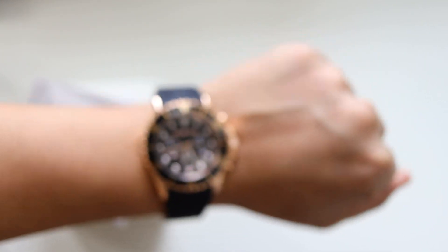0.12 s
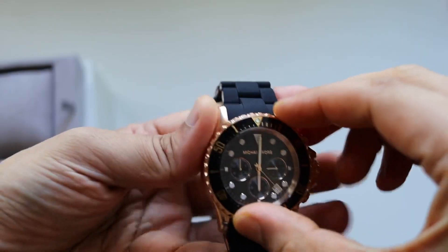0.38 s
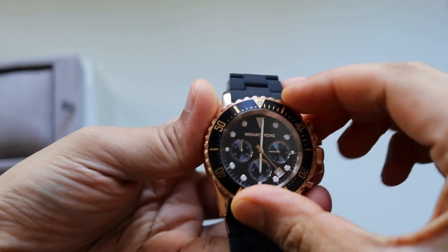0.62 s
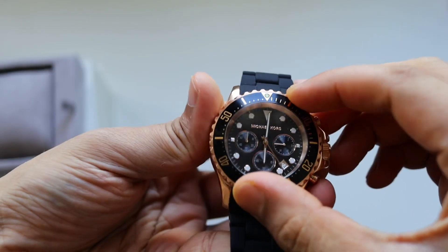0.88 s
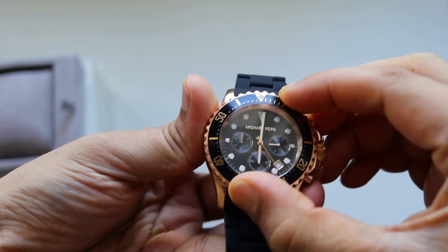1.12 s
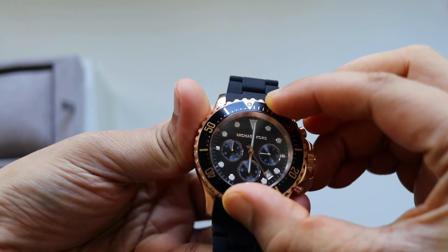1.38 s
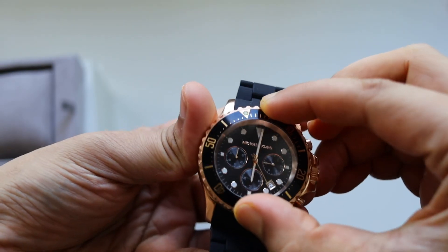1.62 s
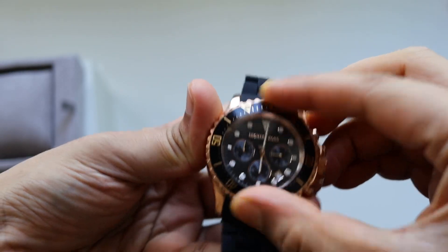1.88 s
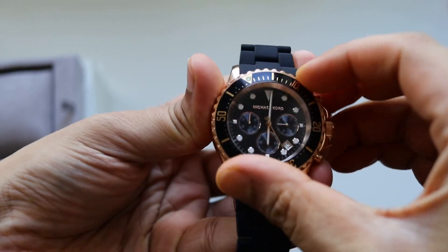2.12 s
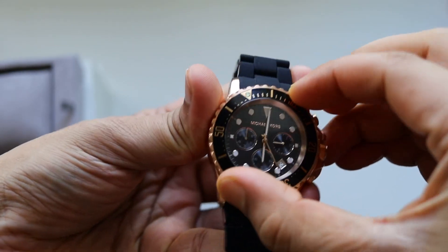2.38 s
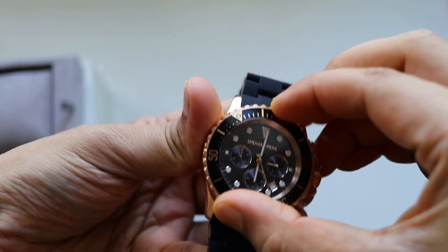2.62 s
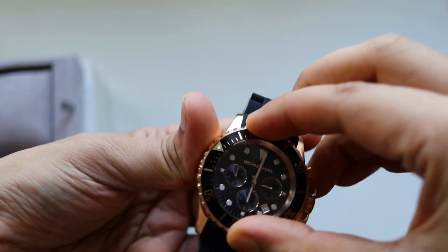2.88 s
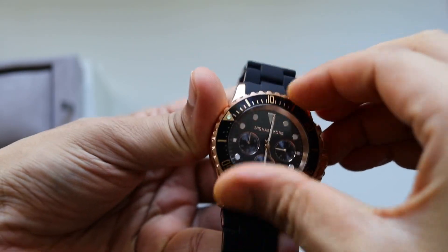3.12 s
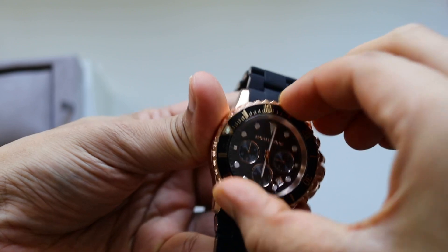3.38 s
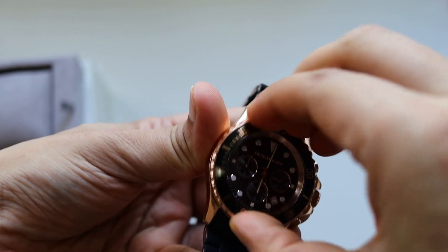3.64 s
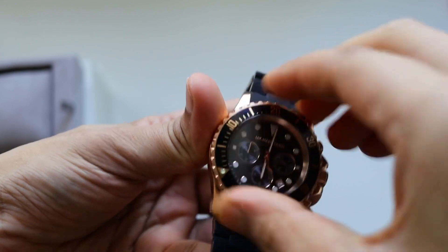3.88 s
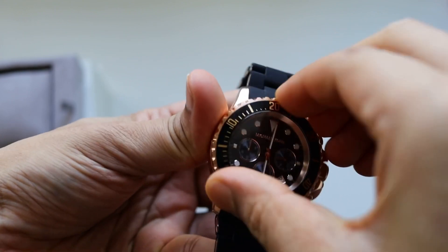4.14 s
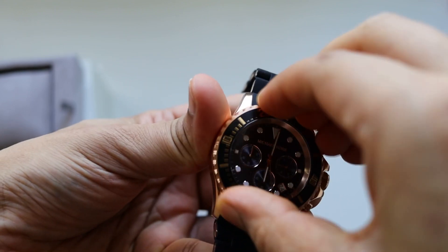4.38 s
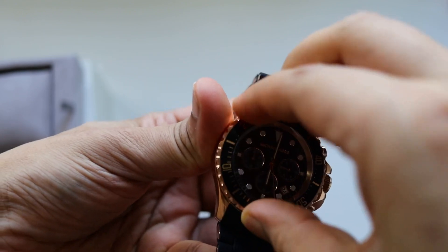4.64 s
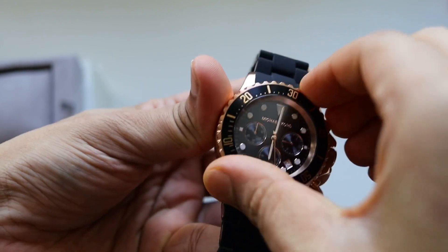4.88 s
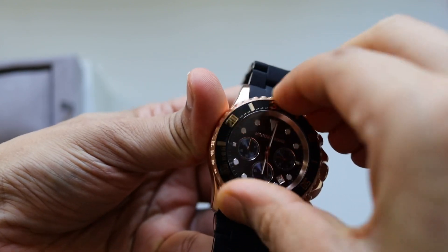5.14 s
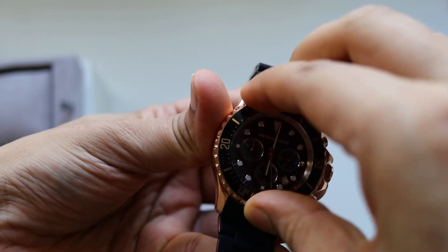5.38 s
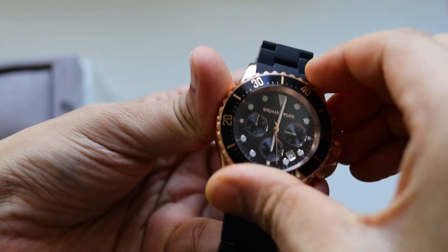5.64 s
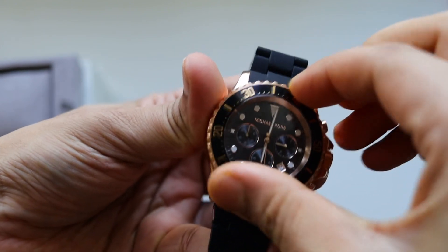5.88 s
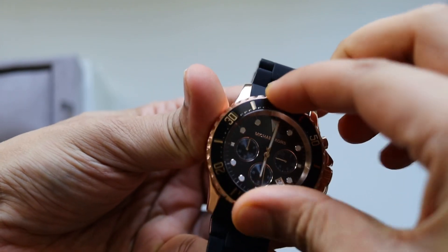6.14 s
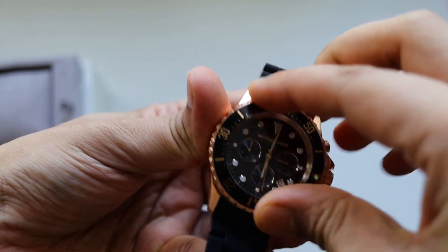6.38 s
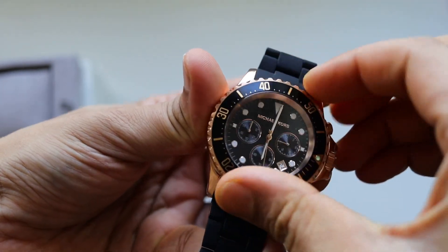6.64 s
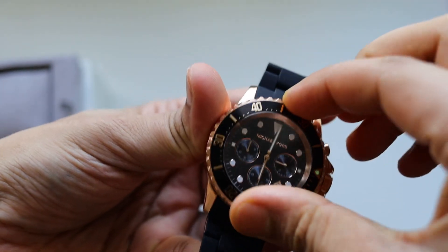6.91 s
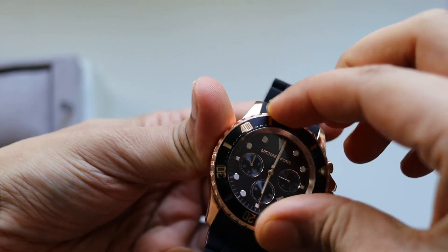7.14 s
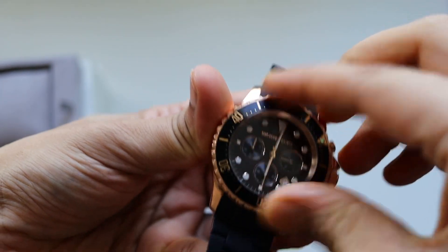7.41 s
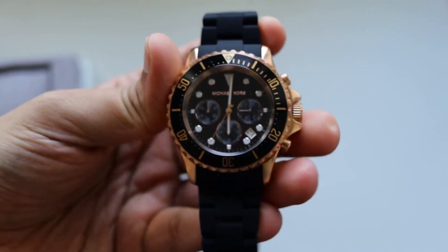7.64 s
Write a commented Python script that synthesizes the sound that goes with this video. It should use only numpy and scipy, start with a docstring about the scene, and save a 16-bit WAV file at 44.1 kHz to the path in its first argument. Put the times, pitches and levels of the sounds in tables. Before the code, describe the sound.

A watch bezel is turned by hand in seven short pushes, each a quick run of bright, crisp metallic ratchet clicks, close up in a quiet room.

```python
"""A quiet room comes on after a quarter second: filtered noise makes its rumble, microphone hiss and faint drone.
A bright rustle of skin follows, and a faint ticking, like a small focus motor, starts and stops throughout.
From 1.4 s a watch bezel is turned by hand in seven short pushes, close to a stereo microphone.
A spring pawl snaps over each tooth: noise bursts crack and set modes of the steel ring and case ringing.
Between pushes, and after the last, hands knock softly and rub as they shift their grip."""
import sys
import numpy as np
from scipy import signal
from scipy.fft import rfft, irfft, next_fast_len
from scipy.io import wavfile

SR = 44100
rng = np.random.default_rng(int(sys.argv[2]) if len(sys.argv) > 2 else 0)


def unload_audio(sound):
    """Save the sound as a 16-bit wav file, at the path given as the first command line argument."""
    columns = np.transpose(np.atleast_2d(sound))
    # keep every value between -1 and 1, then stretch to whole-number steps
    steps = np.round(np.clip(columns, -1, 1) * 32767)
    wavfile.write(sys.argv[1], SR, steps.astype(np.int16))


def boost(x):
    """Linear amplitude factor 10**(x/20) for a level x in decibels (scalar or array-like)."""
    u = np.asarray(x, float) / 20
    return 10 ** u


N = 342812   # length in samples


def rms_one(x):
    """Scales a sound to an rms of 1."""
    return x / np.sqrt(np.mean(x ** 2) + 1e-20)


def early_rms(x):
    """Rms of each sound over its first 10 ms."""
    return np.sqrt(np.mean(x[:, :, :SR // 100] ** 2, axis=2, keepdims=True))


def at_hz(points, hz):
    """Reads a table of (Hz, value) at any pitch, on a logarithmic pitch scale."""
    table_hz, values = np.transpose(points)
    return np.interp(np.log(hz), np.log(table_hz), values)


def band(x, low_hz, high_hz):
    """Keeps the part of a sound between two pitches."""
    return signal.sosfilt(signal.butter(2, [low_hz, high_hz], "band", fs=SR, output="sos"), x)


def drift(corner_hz):
    """Slow chance with spread 1: noise smoothed at one fortieth of the sample rate."""
    r = np.exp(-80 * np.pi * corner_hz / SR)
    slow = signal.lfilter([1], [1, -2 * r, r * r], rng.standard_normal(N // 40 + 2002))[2000:]
    return np.interp(np.arange(N) / 40, np.arange(len(slow)), rms_one(slow))


def ring(force, hz, t60):
    """A mode: a unit click sets a sine of height 1 ringing, which falls 60 dB in t60 seconds."""
    r, w = boost(-60 / (t60 * SR)), 2 * np.pi * hz / SR
    return signal.lfilter([0, np.sin(w)], [1, -2 * r * np.cos(w), r * r], force + 1e-18)


def pair(mid, side, alike):
    """Left and right from a shared and an opposed part."""
    alike = np.clip(alike, -1, 1)
    return np.sqrt(1 + alike) * mid + np.sqrt(1 - alike) * side * np.array([[1], [-1]])


def sides(pan_db):
    """Left and right gains; pan_db is how much louder the left is."""
    return boost(np.stack([pan_db, -pan_db], axis=-1)[..., None] / 2)


def place(times, sounds):
    """Lays short stereo sounds at their moments."""
    out = np.zeros((2, N + sounds.shape[-1]))
    for s, sound in zip(times, sounds):
        first = round(s * SR)
        out[:, first:first + sound.shape[-1]] += sound
    return out[:, :N]


# Faint appliance drone. Each row: middle pitch in Hz, width in Hz, rms level in dB.
DRONE_BANDS = [(101.4, 4, -88), (803, 65, -81), (1588, 56, -94)]


def hum():
    """Narrow bands of noise, the same on both sides, are heard as a wavering drone."""
    return sum(boost(db) * rms_one(band(rng.standard_normal(N), hz - width / 2, hz + width / 2))
               for hz, width, db in DRONE_BANDS)


# Colour of the room's rumble and hiss. Each row: pitch in Hz, relative level per Hz in dB.
ROOM_COLOUR = [(15, -51), (25, -24.5), (103, -0.5), (193, -9.5), (282, -5.5), (403, -15), (817, -17.5),
               (937, -16.5), (2180, -23.5), (4080, -24.5), (6660, -31), (14300, -35.5), (16800, -41.5)]
# How alike left and right are in the room tone. Each row: pitch in Hz, likeness (1 same, -1 opposed).
ROOM_LEFT_RIGHT = [(60, 0.98), (240, 0.92), (950, 0.39), (3770, -0.28), (15000, 0.078)]


def room_tone(room_db=-64.5, flicker_db=1.16):
    """Third-octave bands of rumble and hiss, each with its own level, slight flicker and likeness."""
    out = 0
    edges_hz = 22 * 2 ** np.arange(0, 9.8, 1 / 3)
    white = rng.standard_normal((2, 2, N))
    for k, (low_hz, high_hz) in enumerate(zip(edges_hz, edges_hz[1:])):
        mid, side = band(white[k % 2], low_hz, high_hz)   # neighbouring bands use different noise
        hz = np.sqrt(low_hz * high_hz)
        level = boost(at_hz(ROOM_COLOUR, hz) + flicker_db * drift(2.6))
        out = out + level * pair(mid, side, at_hz(ROOM_LEFT_RIGHT, hz))
    return boost(room_db) * rms_one(out)


def rustle(middle_s=0.298, spread_s=0.017, level_db=-65):
    """Skin rubs briefly: one bright hiss swells and fades, different on each side."""
    swell = np.exp(-0.5 * ((np.arange(N) / SR - middle_s) / spread_s) ** 2)
    return boost(level_db) * swell * rms_one(band(rng.standard_normal((2, N)), 2900, 17000))


# Faint motor steps in even runs. Each row: first step in seconds, last step in seconds, number of steps.
STEP_RUNS = [(.313, .952, 12), (1.062, 1.311, 6), (1.835, 1.892, 2), (2.060, 2.109, 2), (2.172, 2.413, 5),
             (3.048, 3.338, 6), (3.901, 4.049, 4), (4.108, 4.168, 2), (4.786, 4.891, 3), (4.950, 5.011, 2),
             (5.531, 5.890, 7), (6.554, 6.845, 6), (7.444, 7.621, 4), (7.671, 7.719, 2)]
# What a step rings. Each row: pitch in Hz, strength in dB, time to fall 60 dB in seconds.
HOUSING_MODES = [(3570, -27, 0.0013), (4010, 7, 0.0022), (4860, -6, 0.0072), (5460, -8, 0.0046)]


def motor_steps(peak_db=-63, uneven_db=3.5, mode_uneven_db=2.6, burst_s=0.0024):
    """Each step is a tiny burst of force that rings a small plastic housing."""
    s = np.concatenate([np.linspace(*run) for run in STEP_RUNS])
    t = np.arange(SR // 30) / SR
    force = rng.standard_normal((len(s), len(t))) * t * np.exp(-t / burst_s)
    rung = 0
    for hz, db, t60 in HOUSING_MODES:
        strength = boost(db + mode_uneven_db * rng.standard_normal((len(s), 1)))
        rung = rung + strength * ring(force, hz, t60)
    peak = boost(peak_db + uneven_db * rng.standard_normal((len(s), 1)))   # before panning
    rung = rung * peak / np.abs(rung).max(axis=1, keepdims=True)
    return place(s, rung[:, None] * sides(-3.0))


# Hands shifting their grip, a dull rubbing.
# Each row: start in seconds, hold in seconds, level in dB before panning.
GRIP_SHIFTS = [(2.33, 0.02, -69), (4.695, 0.065, -62), (4.83, 0.029, -62), (6.494, 0.11, -65.5),
               (7.619, 0.032, -64)]


def grip(slips_per_s=160, skin_hz=340, rise_db_per_s=307, fall_db_per_s=215, pan_db=-8.5):
    """Skin sticks and slips on case and strap: uneven soft pulses into a dull resonance."""
    t = np.arange(N) / SR
    effort = 0
    for s, hold, db in GRIP_SHIFTS:
        rise = rise_db_per_s * np.maximum(s - t, 0)
        fall = fall_db_per_s * np.maximum(t - s - hold, 0)
        effort = effort + boost(db - rise - fall)
    slips = (rng.random(N) < slips_per_s / SR) * boost(1.26 * rng.standard_normal(N))
    rub = rms_one(band(ring(slips, skin_hz, 0.0072), 114, 1350))
    return effort * rub * sides(pan_db)


# Soft knocks of fingers and strap. Each row: start in seconds, peak in dB before panning, pitch in Hz,
# contact time in seconds, how much louder the left is in dB.
SOFT_KNOCKS = [(2.138, -50.5, 2300, 0.0028, -9), (2.149, -59, 2400, 0.0037, -8),
               (2.262, -38, 280, 0.0045, -8), (2.329, -53, 400, 0.0033, -2), (3.09, -62, 690, 0.0028, -12),
               (5.566, -54, 700, .003, -19), (7.511, -53, 675, 0.0035, -18)]


def knocks(scuff_db=-8, ring_cycles=12.7):
    """Each soft contact is a short burst of force: a broad scuff and one dull resonance."""
    t, sounds = np.arange(SR // 8) / SR, []
    for s, peak_db, hz, contact_s, pan_db in SOFT_KNOCKS:
        force, scuff = rng.standard_normal((2, len(t))) * t * np.exp(-t / contact_s)
        # the resonance falls 60 dB in ring_cycles of its own pitch
        dull = rms_one(band(ring(force, hz, ring_cycles / hz), hz / 2, hz * 2))
        knock = dull + boost(scuff_db) * rms_one(band(scuff, hz * 0.51, hz * 1.9))
        sounds.append(boost(peak_db) * knock / np.abs(knock).max() * sides(pan_db))
    return place(np.array(SOFT_KNOCKS)[:, 0], np.array(sounds))


# How alike left and right are in a snap. Each row: pitch in Hz, likeness (1 same, -1 opposed).
SNAP_LEFT_RIGHT = [(1300, 0.73), (3000, 0.8), (6000, 0.95), (9000, 0.9), (14000, 0.98)]
# Each row: pitch in Hz, how much louder the left is in dB.
SNAP_LEFT_LOUDER = [(1300, -2), (2500, -3), (5000, -0.5), (9000, 1), (14000, -4.5)]
# Each row: pitch in Hz, phase in radians by which the left leads.
SNAP_LEFT_LEAD = [(1300, 0.45), (3000, 0.16), (6000, 1.07), (9000, 1.88), (14000, 0.82)]


def two_ports(x):
    """A close, directional source reaches the two ports with its own level, phase and likeness at each pitch."""
    size = next_fast_len(N)
    hz = np.maximum(np.arange(size // 2 + 1) * SR / size, 20)
    mid, side = rfft(x, size)
    # half the difference goes to each port, in opposite directions
    louder = at_hz(SNAP_LEFT_LOUDER, hz) * np.log(10) / 40
    lead = 0.5j * at_hz(SNAP_LEFT_LEAD, hz)
    turn = np.exp((louder + lead) * np.array([[1], [-1]]))
    return irfft(pair(mid, side, at_hz(SNAP_LEFT_RIGHT, hz)) * turn, size)[:, :N]


def pawl_force(t, harder_db, peak_db):
    """Strength of the force: the pawl scrapes up to the tip, drops, rebounds once and chatters to rest."""
    slip_db, slip_s, chatter_db, chatter_s = -22, 0.0018, -16, 0.006
    rebound_db, rebound_s, crack_s, softer_db = -14, 0.0029, 0.00044, 11.0
    # weaker snaps land more softly; crack_s is the landing at -17.5 dB
    land_s = crack_s * np.exp(-(peak_db[:, None] + 17.5) / softer_db)
    late, strength = rng.standard_normal((2, len(harder_db), 1))
    back = t - rebound_s * np.exp(0.2 * late)   # time since the rebound
    slip = boost(slip_db) * (t < 0) * np.exp(-np.abs(t) / slip_s)
    chatter = boost(chatter_db) * np.exp(-np.abs(t) / chatter_s)
    drop = (t >= 0) * (np.exp(-np.abs(t) / land_s) + chatter)
    rebound = boost(rebound_db + 3.7 * strength) * (back >= 0) * np.exp(-np.abs(back) / land_s)
    return slip + drop + rebound


def add_modes(register, force, modes, tune, detune, spread_db=1.5):
    """Adds to a crack the modes that ring on; the fingers load the watch differently at every tooth."""
    count = len(force)
    for hz, mode_db, t60 in modes:
        shifted_hz = hz * tune * np.exp(detune * rng.standard_normal(count))
        rung = np.array([ring(f, f_hz, t60) for f, f_hz in zip(force, shifted_hz)])
        energy = np.sqrt(np.mean(rung ** 2, axis=2, keepdims=True))
        rung = rung * energy.mean() / energy   # every tooth feeds each mode about alike
        register = register + rung * boost(mode_db + spread_db * rng.standard_normal((count, 1, 1)))
    return register


# Pawl snaps, one per tooth. Each row: time in seconds, snap level in dB that the part levels build on.
TOOTH_SNAPS = [(1.392, -23), (1.4481, -23), (1.502, -22), (1.558, -23), (1.619, -20), (1.6612, -19.5),
               (1.7, -17.5), (1.729, -18.5), (2.4448, -38), (2.482, -32), (2.5331, -24), (2.6465, -25),
               (2.699, -22.5), (2.7386, -20.5), (2.7659, -20), (2.794, -16.5), (2.8188, -18.5),
               (2.8362, -20.5), (2.8542, -17.5), (2.8736, -21.5), (2.897, -16), (3.4004, -11),
               (3.4201, -14.5), (3.4398, -14.5), (3.457, -19.5), (3.475, -19), (3.496, -21), (3.52, -22.5),
               (3.544, -26.5), (3.574, -24.5), (3.5943, -21), (3.6127, -26), (3.6324, -27), (3.6525, -21),
               (3.67, -24.5), (3.69, -23.5), (3.706, -20), (3.718, -32.5), (3.729, -24), (3.7479, -21.5),
               (3.781, -21.5), (4.219, -37.5), (4.2421, -22.5), (4.3161, -24.5), (4.3443, -23.5),
               (4.3623, -26), (4.3995, -23.5), (4.4389, -24), (4.4644, -26), (4.4955, -25), (4.5253, -25),
               (4.545, -28.5), (4.569, -23.5), (4.587, -23.5), (4.6062, -22), (4.6257, -21.5),
               (4.6523, -27), (5.063, -25), (5.0919, -17.5), (5.1542, -21), (5.1828, -24), (5.1986, -23.5),
               (5.2264, -17.5), (5.246, -18), (5.2736, -18), (5.3048, -20), (5.3158, -19), (5.3458, -18),
               (5.3591, -19), (5.3766, -21.5), (5.3937, -19), (5.4663, -29), (5.9431, -20), (5.9664, -16.5),
               (5.991, -18), (6.0422, -15.5), (6.0736, -18), (6.105, -15), (6.143, -13), (6.1671, -16.5),
               (6.1911, -16.5), (6.218, -17), (6.2521, -19), (6.278, -24), (6.2953, -22), (6.3065, -28),
               (6.328, -20.5), (6.3411, -22), (6.8822, -17), (6.9, -15), (6.929, -17), (6.9762, -16.5),
               (7.004, -20.5), (7.046, -17.5), (7.0808, -21), (7.1142, -24), (7.1408, -22.5),
               (7.197, -19.5), (7.225, -18), (7.2511, -17.5), (7.305, -17), (7.3254, -19.5)]
# Each push holds the watch in its own way. Each row: start in seconds, case level in dB, edge level in dB,
# edge drift in dB per second, case pitch factor. The levels add to those of the snap and the part.
HAND_PUSHES = [(1.39, -15, -22, 34, 1.2), (2.44, -16, -15.5, 19, 1.056), (3.4, -16, -17, -8, 1.026),
               (4.22, -18.5, -20, 0, 0.92), (5.06, -20.5, -14.5, 4.5, 0.97), (5.94, -14, -14, 2.5, 0.976),
               (6.88, -16.5, -9, -8, 0.94)]
# Ring balance for each push: gain in dB of the treble around 10 kHz.
PUSH_TREBLE_DB = [3.5, 1.5, -0.5, 1, -0.3, 1.7, 0.5]
# Three parts of a snap: case, ring and edge. Each holds the crack's lowest and highest pitch in Hz, then the
# modes that ring on. Each mode row: pitch in Hz, strength in dB, time to fall 60 dB in seconds.
CASE_PART = (2600, 4150), [(2540, -43, 0.00403), (2884, -21, 0.0061), (3340, -22.5, 0.0056),
             (4350, -22.5, 0.0066)]
RING_PART = (4320, 14800), [(5410, -21.5, 0.0043), (6236, -17, 0.005), (6553, -28.5, 0.011),
             (6630, -29.5, 0.041), (10660, -26, 0.015)]
EDGE_PART = (12500, 14000), [(14050, -18.5, 0.019), (14420, -11.5, 0.0099)]


def snaps(late_s=0.0008):
    """A pawl drops over each tooth; the noisy force cracks in three parts of the watch and rings their modes."""
    case_part_db, ring_part_db, edge_part_db = -9.5, -19, -9.5   # levels over the first 10 ms
    case_chance_db, edge_chance_db = 5, 4.5   # tooth-to-tooth scatter
    case_db_per_db = -0.47   # harder snaps give the case a smaller share
    crack_db_per_db = 0.55   # gentle snaps ring more than they crack
    s, peak_db = np.transpose(TOOTH_SNAPS)
    harder_db = peak_db - peak_db.mean()
    push = np.searchsorted(np.array(HAND_PUSHES)[:, 0], s + 0.1) - 1
    start, case_db, edge_db, edge_drift, pitch = np.array(HAND_PUSHES)[push].T
    case_chance, edge_chance = rng.standard_normal((2, len(s)))
    case_db = case_part_db + case_db + case_db_per_db * harder_db + case_chance_db * case_chance
    edge_db = edge_part_db + edge_db + edge_drift * (s - start) + edge_chance_db * edge_chance

    t = np.arange(-SR // 250, SR // 8) / SR   # begins 4 ms before the drop
    strength = pawl_force(t, harder_db, peak_db)
    # two unrelated noises, each with a shared and an opposed part
    crack, force = strength[:, None] * rng.standard_normal((2, len(s), 2, len(t)))
    parts = [(CASE_PART, case_db, pitch, 0.02), (RING_PART, ring_part_db, 1, 0.008),
             (EDGE_PART, edge_db, 1, 0.01)]   # last number: chance in mode pitch
    out = 0
    for (edges_hz, modes), level_db, tune, detune in parts:
        register = band(crack, *edges_hz) * boost(crack_db_per_db * harder_db)[:, None, None]
        register = add_modes(register, force, modes, tune, detune)
        out = out + register * boost(peak_db + level_db)[:, None, None] / early_rms(register)
    treble = band(out, 8000, 12000)
    out = out + (boost(PUSH_TREBLE_DB)[push][:, None, None] - 1) * treble

    # so small a body hardly radiates bass, least when struck gently
    thin_hz = 2050 - 45 * harder_db
    out = np.array([signal.sosfilt(signal.butter(4, hz, "high", fs=SR, output="sos"), one)
                    for one, hz in zip(out, thin_hz)])
    # a faint thump passes through the hand
    thump = band(crack, 253.5, 1000)
    thump_level = boost(peak_db - 49 + 0.23 * harder_db)[:, None, None]
    out = out + thump * thump_level / early_rms(thump)
    return two_ports(place(s + t[0] + late_s, out))


def reverb(x, t60_s=0.27, level_db=-11.5, wall_cut_hz=10000):
    """The room answers with a dense tail of noise that dies faster in the treble."""
    t = np.arange(SR // 2) / SR
    white = rng.standard_normal((2, len(t))) * (1 - np.exp(-(t / 0.00047) ** 2))   # soft start
    dull = signal.lfilter(*signal.butter(1, wall_cut_hz, fs=SR), white)
    tail = dull * boost(-60 * t / t60_s) + (white - dull) * boost(-60 * t / (0.38 * t60_s))
    tail = tail / np.sqrt(np.sum(tail ** 2, axis=1, keepdims=True))
    return boost(level_db) * signal.fftconvolve(x, tail, axes=1)[:, :N]


def scene():
    """Snaps and knocks with their reverb, over the softer sounds and the room."""
    near = snaps() + knocks()
    return near + reverb(near) + grip() + motor_steps() + rustle() + room_tone() + hum()


def low_pass(x):
    """Removes everything above the highest recorded frequency."""
    return signal.sosfilt(signal.butter(12, 16970, fs=SR, output="sos"), x)


def record(dry, start_s=0.2577, fade_s=0.0022):
    """Silence until the sound comes on; the microphone chain cuts the deepest bass and the top."""
    on = np.clip((np.arange(N) / SR - start_s) / fade_s, 0, 1)
    low_cut = signal.butter(2, 44, "high", fs=SR, output="sos")
    top_cut = signal.cheby2(10, 60, 17080, fs=SR, output="sos")
    mix = signal.sosfilt(np.vstack([low_cut, top_cut]), dry) * on
    return low_pass(mix)


dry = scene()
out = record(dry)
unload_audio(out)
```